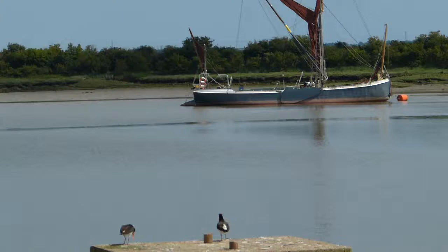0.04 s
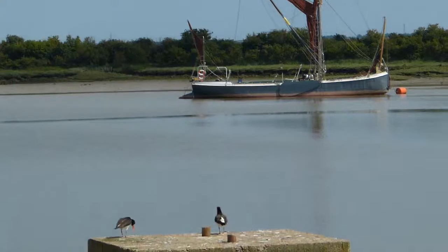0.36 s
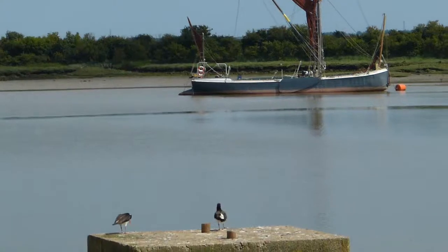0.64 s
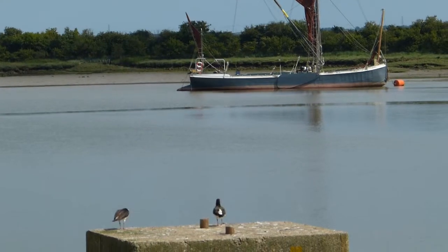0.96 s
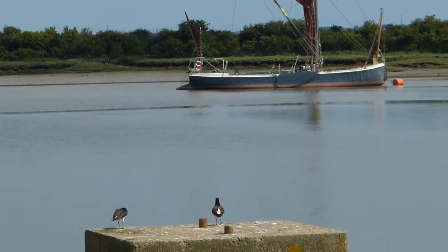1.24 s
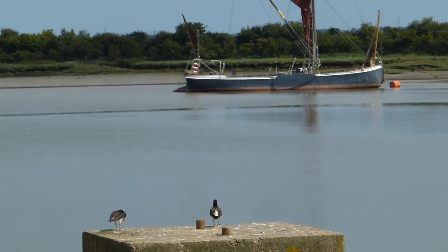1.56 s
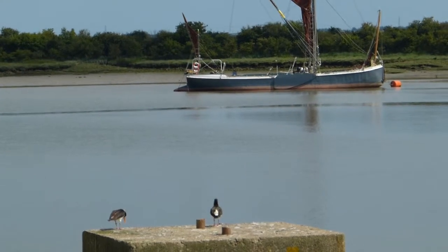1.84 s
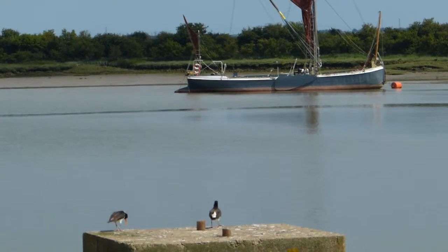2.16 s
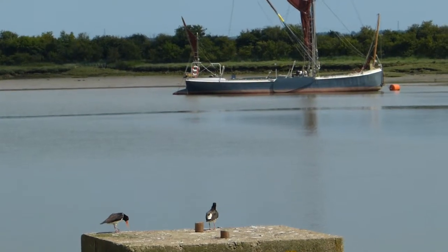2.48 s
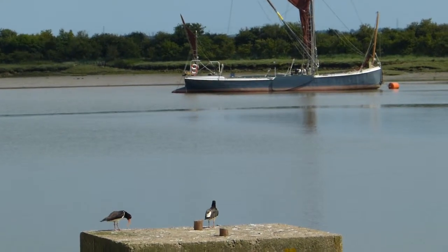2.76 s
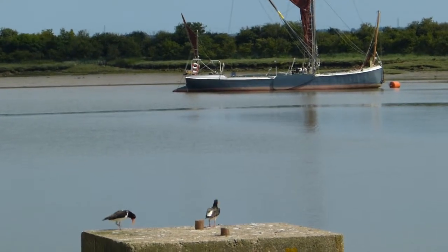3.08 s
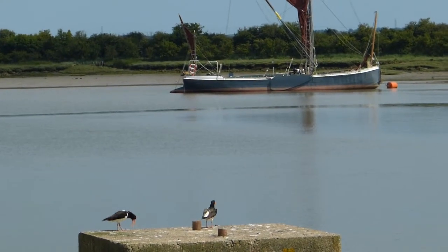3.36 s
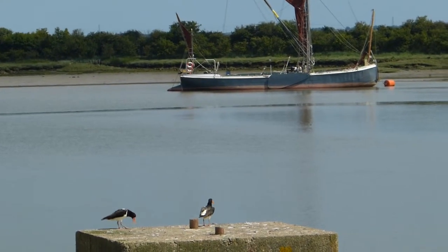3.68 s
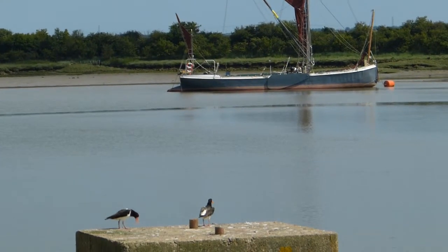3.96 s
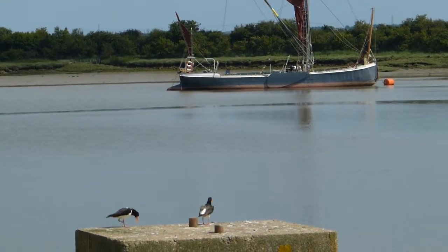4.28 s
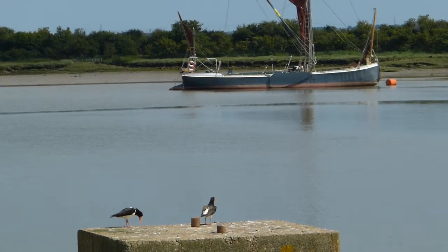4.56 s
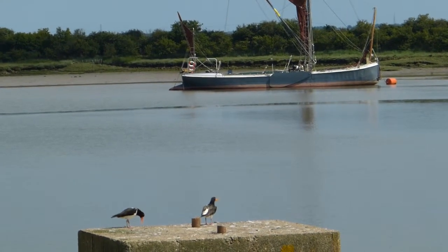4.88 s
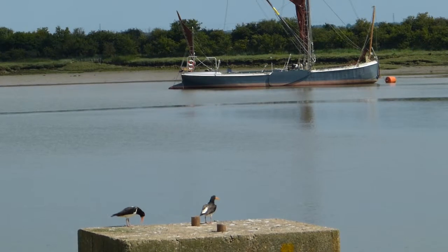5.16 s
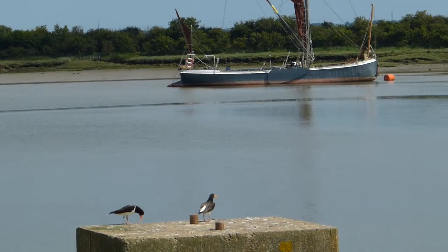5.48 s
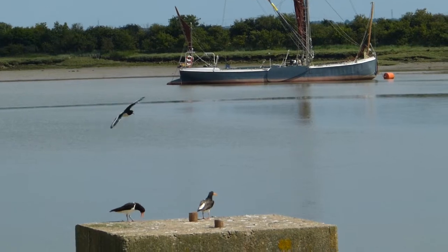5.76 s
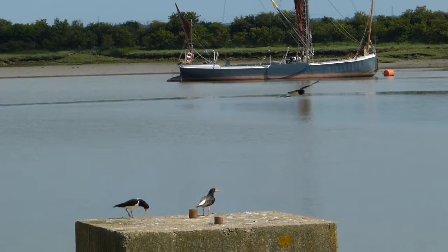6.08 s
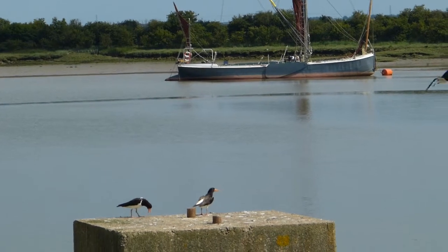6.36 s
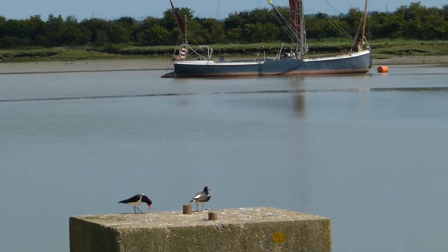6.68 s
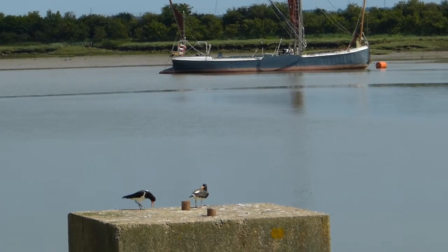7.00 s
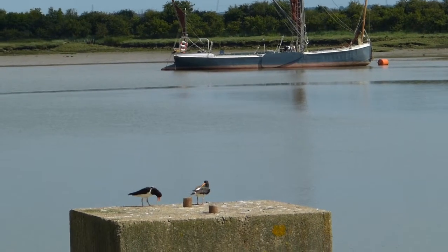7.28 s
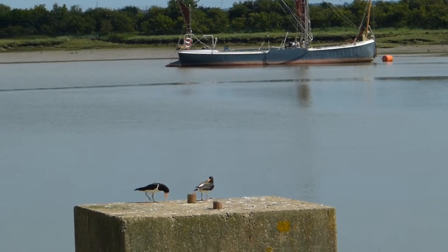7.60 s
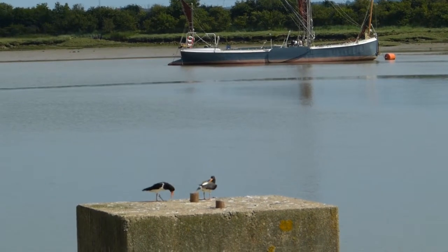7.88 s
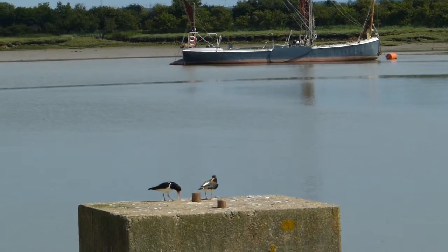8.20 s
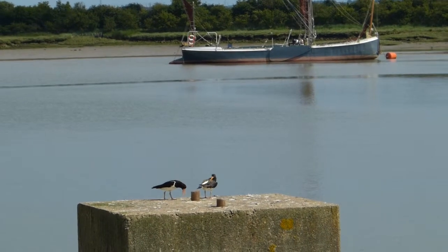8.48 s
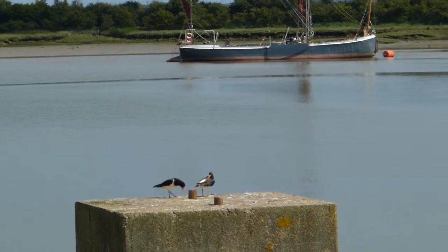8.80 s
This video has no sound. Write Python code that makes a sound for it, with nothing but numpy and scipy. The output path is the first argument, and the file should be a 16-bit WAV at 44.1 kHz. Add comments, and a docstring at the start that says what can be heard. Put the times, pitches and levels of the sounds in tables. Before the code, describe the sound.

Oystercatchers pipe loudly on a quay beside a calm estuary. Their shrill whistles come first in pairs, then as a quick trill, three drawn-out notes, falling calls and a second trill. The pairs return and grow louder to the end, each note leaving a slight echo. Behind them a light breeze hisses and softly rumbles on the microphone, and gulls cry faintly far away.

```python
"""A light breeze hisses and rumbles on a stereo microphone by a calm estuary; gulls cry far off.
At once oystercatchers on the quay pipe in alarm, each syrinx sounding shrill arched whistles in pairs.
A quick trill follows near 2 s, then three drawn-out whistles, diving notes and a second trill at 4.2 s.
From about 6 s the pairs return and grow louder to the end. After every note come close echoes
off the stonework and a faint tail from the harbour."""
import sys
import numpy as np
from scipy import signal
from scipy.fft import rfft, irfft, next_fast_len
from scipy.io import wavfile
from scipy.ndimage import map_coordinates

SR = 44100
rng = np.random.default_rng(int(sys.argv[2]) if len(sys.argv) > 2 else 0)


def generate_wav(sig):
    """Save sig (samples, or channels by samples) to the path in sys.argv[1] as 16-bit PCM at SR."""
    pcm = np.round(np.clip(np.atleast_2d(sig).T, -1, 1) * 32767).astype(np.int16)
    wavfile.write(sys.argv[1], SR, pcm)


N = 389844

# gusts on the microphone: time_s, relative_level_db
GUSTS = [(.22, -43.5), (.6, -58), (0.751, -48), (1.3, -48), (1.6, -50.5), (1.95, -46.5), (2.4, -55.5),
         (3.1, -57.5), (3.9, -72.5), (4.35, -57), (4.9, -54.5), (5.3, -61.5), (6.4, -69), (6.85, -61),
         (6.96, -53.5), (7.1, -60.5), (8.8, -64.5)]
# spectra of wind on the ports and of air over the water: frequency_hz, density_db
RUMBLE_SPECTRUM = [(25, -14.5), (45, -14.5), (70, -4.5), (130, 4.5), (170, 3.5), (210, -4.5), (290, -7.5),
                   (380, -16), (600, -21), (1200, -48.5), (3000, -120)]
AIR_SPECTRUM = [(25, -1), (60, -8), (170, 1), (300, -0.5), (500, 0), (950, -1.5), (1350, -4), (2000, -3.5),
                (2800, -7), (3800, -11.5), (6000, -6.5), (9000, -17), (12000, -28.5), (15500, -52)]
# likeness of the wind noise at the two ports: frequency_hz, correlation
PORT_COHERENCE = [(25, 0.24), (60, -0.079), (130, -0.8), (260, -0.81), (500, -0.74), (1000, -0.39),
                  (2000, 0.6), (8000, -0.07)]
# stereo balance of breeze and gulls: frequency_hz, left_minus_right_db
SHORE_BALANCE = [(250, -0.5), (500, -0.5), (1000, -2.5), (2000, -8.5), (4000, -1)]

# gull cries: start_s, length_s, top_pitch_hz, pitch_lost_share, relative_level_db, treble_db
GULL_CRIES = [(0.214, 0.47, 1025, 0.15, -54.5, -2), (0.617, 0.43, 1011, 0.12, -54, -4),
              (1.38, 0.33, 1023, 0.36, -54.5, -8), (1.7, 0.35, 1030, 0.081, -55.5, 17),
              (2.037, 0.13, 1070, .1, -50, -7), (2.65, 0.26, 1040, .14, -52, -11),
              (2.85, 0.23, 1020, 0.19, -49.5, -26), (3.521, 0.27, 1111, .12, -53.5, -8),
              (3.711, 0.24, 992, 0.087, -49.5, -14), (3.997, .31, 955, 0.067, -55.5, -6),
              (4.197, 0.35, 1032, 0.27, -50, 2), (4.501, .34, 1035, .14, -53, -0.5),
              (4.92, 0.23, 1036, .1, -50, -4), (5.099, 0.38, 1067, 0.17, -49.5, 4),
              (5.617, 0.23, 1002, 0.088, -49.5, -5), (5.943, .33, 1082, .18, -51.5, -18),
              (6.296, 0.25, 980, 0.19, -54, 11), (6.779, 0.44, 1018, .1, -48, 0.5),
              (7.025, 0.43, 1170, 0.27, -48, -13), (7.419, 0.42, 1072, 0.23, -49.5, -5),
              (7.995, 0.26, 1048, 0.17, -47.5, -12), (8.421, 0.2, 970, 0.059, -47.5, -3),
              (8.575, 0.45, 1056, 0.071, -47.5, 3)]
# a gull's harmonics 1 to 7: level_db
GULL_HARMONICS = [-13.5, -2.5, -4.5, -3, -1, -15, -25]
# resonances of a gull's throat: frequency_hz, density_db
GULL_THROAT = [(400, -37), (750, -15.5), (1020, -3), (1350, -15), (1600, -2), (1950, 4.5), (2400, -17),
               (3300, -30.5), (4200, -0.5), (5200, -10), (6500, -28), (9000, -39.5), (12000, -51.5),
               (15500, -79)]

# reverberation times of the three spaces: frequency_hz, t60_s
SHORE_DECAY = [(500, 0.057), (3000, 0.32), (12000, 0.15)]
HARBOUR_DECAY = [(500, 0.22), (3000, 1), (6500, 0.62), (12000, 0.61)]
QUAY_DECAY = [(500, 0.054), (3000, 0.1), (6500, 0.15), (12000, 0.0072)]
# reflections off the quay: delay_s, left_db, right_db
WALL_ECHOES = [(.0019, -54, -34.5), (.0029, -18, -35), (.0042, -11.5, -25.5), (.0072, -22.5, -18),
               (0.023, -17, -25.5)]

# colouring of an oystercatcher's harmonics by throat and bill, relative to the fundamental:
# pitch_hz, second_db, third_db, fourth_db, fifth_db
TRACT_COLOUR = [(1410, 7, 1, -18.5, -33), (1900, 1, -23, -30.5, -51), (2375, -4, -12, -42.5, -55.5),
                (2500, -8.5, -18.5, -37.5, -48), (2650, -11, -21.5, -38.5, -52.5),
                (2925, -12.5, -37, -51, -66.5), (2980, -14.5, -33, -59.5, -89.5),
                (3219, -4.5, -28.5, -50, -89)]
# gain from the third harmonic up: time_s, gain_db
TREBLE_GAIN = [(.2, -3.5), (1.4, 1.5), (1.9, 1.5), (4.5, 4), (6.6, 2.5), (8.8, 4)]
# contour of each kind of note:
# start_hz, shoulder_hz, end_hz, slump_share, dive_exponent, start_db, shoulder_db, dive_db
PIP_CONTOUR = (2513.5, 2425, 2084, 0.91, 4, -5.5, -5.5, -33)
PEEP_CONTOUR = (2588.5, 2663.5, 1424.5, 0.57, 3, -3.5, -2, -37)
TICK_CONTOUR = (2509, 2389.5, 2208.5, 0.8, 1.3, -2.2, 4, -35)
WHISTLE_CONTOUR = (2693, 2483.5, 1946.5, 0.92, 12.5, -2, -7.5, -23)
HICCUP_CONTOUR = (1756, 2472, 1938, -10, 3.8, -15, -3, -21.5)
# notes: start_s, rise_s, hold_s, fall_s, top_pitch_hz, level_db, brightness_db
PIP_NOTES = [(0.2209, 0.0063, 0.024, 0.029, 3187, -17.5, 0.5), (0.4881, 0.017, 0.026, 0.023, 3157, -16, -1),
             (0.771, 0.0085, 0.034, 0.026, 3155, -21.5, 2), (1.0559, 0.013, 0.026, 0.027, 3187, -18.5, -3),
             (1.3332, 0.0037, 0.032, 0.019, 3191, -17, -2.5),
             (1.5719, 0.0043, 0.018, 0.017, 3154, -18, 1.5),
             (2.4082, 0.021, 0.00082, 0.017, 2883, -18, 0.5),
             (3.8532, 0.012, 0.0014, 0.019, 2900, -17.5, 0), (4.0635, 0.009, 0.0083, 0.021, 3096, -17, 1),
             (4.8175, 0.031, 0, 0.0088, 3094, -17, -1.5), (4.9955, 0.007, 0.012, 0.02, 3152, -16.5, -1.0),
             (5.2344, 0.008, 0.0074, 0.029, 3110, -16, -2), (6.2664, 0.009, 0, 0.024, 2965, -17.5, 1),
             (6.5034, 0.0078, 0.0085, 0.014, 3007, -17, 2.5),
             (6.7245, 0.006, 0.011, 0.023, 3150, -17.0, 2.5),
             (6.9463, 0.0054, 0.013, 0.021, 3156, -16.0, 1.5),
             (7.169, 0.007, 0.01, 0.023, 3158, -16.5, -1.5), (7.3754, 0.017, 0, 0.026, 3170, -17, -0.5),
             (7.5834, 0.018, 0.0015, 0.023, 3186, -15.0, -0.5), (7.7995, 0.019, 0, 0.025, 3170, -15, -0.5),
             (8.0206, 0.021, 0, 0.025, 3183, -14.0, 0), (8.2499, 0.021, 0, 0.023, 3155, -13, -2.0),
             (8.4807, 0.01, 0.0073, 0.02, 3168, -14.5, 0.5), (8.7119, 0.014, 0.004, 0.023, 3183, -15, 1.5)]  # high arches that close the pairs
PEEP_NOTES = [(0.3846, 0.0097, 0.00078, 0.035, 2620, -21.5, 1), (0.6655, 0.014, 0.0, 0.031, 2598, -23, 2),
              (0.9473, 0.012, 0.00084, 0.036, 2905, -19, -8.5), (1.2286, 0.013, 0.0, 0.034, 2858, -19, -7),
              (1.4867, 0.008, 0.0031, 0.028, 2936, -16.5, -6.5),
              (2.2442, 0.02, 0.002, 0.0098, 2687, -23, 2.5), (2.3565, 0.0087, 0, 0.044, 2500, -24, -4.5),
              (3.2365, 0.0015, 0.018, 0.083, 2665, -18.0, 0.5),
              (3.4964, 0.0011, 0.02, 0.089, 2680, -19.5, 1.5), (3.7451, 0.0035, 0.015, 0.05, 2652, -19, -1),
              (3.99, 0.004, 0.0019, 0.038, 2610, -18.5, -2.5), (5.1269, 0.008, 0.006, 0.048, 2935, -14, -2),
              (5.3816, 0.006, 0.023, 0.083, 2993, -15.5, -2), (5.6454, 0.0079, 0.0089, 0.07, 2953, -15, -2),
              (5.9018, 0.015, 0.0059, 0.054, 2948, -15.5, 0.5),
              (6.1554, 0.011, 0.0045, 0.053, 2944, -16.5, 0.5),
              (6.4017, 0.019, 0.00037, 0.035, 2837, -16.5, 0.0),
              (6.6396, 0.0017, 0.0069, 0.033, 2612, -18, 0.5), (6.8589, 0.013, 0.0, 0.026, 2860, -16, 0),
              (7.0783, 0.015, 0, 0.037, 2980, -16.0, -0.5), (7.3026, 0.014, 0, 0.042, 2970, -16.5, -1.0),
              (7.5095, 0.019, 0.0008, 0.033, 2910, -13.5, -1.5),
              (7.7286, 0.0028, 0.0093, 0.041, 2737, -17.0, 1),
              (7.9481, 0.0042, 0.0042, 0.043, 2760, -17.0, 1),
              (8.1704, 0.004, 0.0078, 0.045, 2710, -15.5, -1),
              (8.4038, 0.0024, 0.0037, 0.037, 2684, -18.5, 1.0),
              (8.626, 0.0041, 0.0082, 0.039, 2687, -19.5, 3)]  # lower, long-diving notes that open the pairs
TICK_NOTES = [(1.6866, 0.0015, 0.0031, 0.025, 2580, -22, -1),
              (1.7474, 0.01, 0.0036, 0.0048, 2460, -22.0, -4),
              (1.8079, 0.0057, 0.0038, 0.011, 2470, -22.5, -3),
              (1.8668, 0.002, 0.0076, 0.019, 2532, -23, -2),
              (1.9341, 0.00067, 0.0082, 0.015, 2534, -23, -2.5),
              (2.0059, 0.0012, 0.0033, 0.013, 2560, -22, -2),
              (2.0788, 0.0012, 0.0041, 0.013, 2550, -24.5, -2),
              (2.156, 0.0063, 0.001, 0.0056, 2480, -25, -2.5),
              (4.1901, 0.0012, 0.0018, 0.016, 2500, -20.5, -2),
              (4.2606, 0.002, 0.00083, 0.014, 2480, -22, -2.5),
              (4.33, 0.0023, 0.0051, 0.0097, 2650, -18.5, -5),
              (4.404, 0.0075, 0.0011, 0.0073, 2850, -20.0, -6.5),
              (4.4757, 0.0035, 0.0092, 0.0044, 2880, -18, -6.5),
              (4.5539, 0.013, 0.0045, 0.005, 2920, -17.5, -4),
              (4.6469, 0.0054, 0.0097, 0.0037, 2890, -16.5, -5.5),
              (4.741, 0.0066, 0.0025, 0.007, 2790, -19, -4.5),
              (5.7657, 0.0037, 0.0054, 0.019, 2680, -19, 2),
              (6.015, 0.0015, 0.0082, 0.026, 2696, -18.0, 0.5)]  # the short notes of the trills
WHISTLE_NOTES = [(2.5483, 0.0044, 0.044, 0.062, 2662, -18.5, -1.5),
                 (2.7691, 0.0054, 0.03, 0.084, 2650, -16.5, -2.5),
                 (2.9986, 0.0048, 0.041, 0.083, 2652, -17.5, -2)]  # drawn-out level notes
HICCUP_NOTES = [(3.3442, 0.014, 0.0068, 0.016, 2486, -25, -2),
                (3.5941, 0.018, 0.0065, 0.014, 2465, -24.5, -2.5),
                (5.4857, 0.015, 0.0089, 0.021, 2513, -22.5, -0.5)]  # upward swoops after a long dive


def amp(db):
    """Amplitude ratio of a level in decibels."""
    return 10 ** (np.asarray(db) / 20)


def unit(x):
    """Normalisation to rms 1."""
    return x / np.sqrt(np.mean(x ** 2) + 1e-20)


def ease(u):
    """A raised-cosine step from 0 to 1."""
    return np.sin(np.pi / 2 * np.clip(u, 0, 1)) ** 2


def along(points, hz):
    """Interpolation on a logarithmic frequency axis."""
    frequencies, values = np.transpose(points)
    return np.interp(np.log(hz + 1), np.log(frequencies + 1), values)


def wobble(rate_hz, size):
    """Smooth random modulation: a spline through Gaussian knots."""
    knots = rng.standard_normal(int(size * rate_hz / SR) + 4)
    return map_coordinates(knots, [np.arange(size) * rate_hz / SR])


def filtered(x, response):
    """Linear filtering: the spectrum is multiplied by a frequency response."""
    size = next_fast_len(N + SR // 2)
    return irfft(rfft(x, size) * response(np.fft.rfftfreq(size, 1 / SR)), size)[..., :N]


def add(track, start_s, sound):
    """Superposition of a sound on a track."""
    part = track[max(round(start_s * SR), 0):][:len(sound)]
    part += sound[:len(part)]


def port_noise(spectrum):
    """Partial coherence: the ratio of mid to side noise sets how alike the two ports sound."""
    def response(hz):
        angle = np.arccos(np.clip(along(PORT_COHERENCE, hz), -1, 1)) / 2
        return amp(along(spectrum, hz)) * [np.cos(angle), np.sin(angle)]
    mid, side = filtered(rng.standard_normal((2, N)), response)
    return unit(np.array([mid + side, mid - side]))


def breeze():
    """Flow noise: gusts rumble on the microphone over a nearly steady hiss of air."""
    gust_db = np.interp(np.arange(N) / SR, *np.transpose(GUSTS))
    rumble_db = gust_db + 1 + 1.3 * wobble(9.1, N) + 1.7 * wobble(38, N)
    rumble = amp(rumble_db) * port_noise(RUMBLE_SPECTRUM)
    air = amp(-54 + 0.21 * wobble(3.6, N)) * port_noise(AIR_SPECTRUM)
    return rumble + air


def reverberation(x, decay, delay_s, width):
    """A diffuse field: convolution with noise that decays exponentially, each band at its own rate."""
    hz, t, spectra = signal.stft(rng.standard_normal((2, SR // 2)), SR, nperseg=256)
    envelope = amp(-60 * t / along(decay, hz)[:, None])
    mid, side = signal.istft(spectra * envelope, SR, nperseg=256)[1]
    tail = np.array([mid + width * side, mid - width * side])
    delayed = np.pad(x, (round(delay_s * SR), 0))
    return signal.fftconvolve(delayed[None], tail / np.linalg.norm(tail[0]), axes=1)[:, :N]


def gulls(jitter=0.0078, crest_share=.3, rise_share=0.064, flutter_db=3.0):
    """Source and filter: harmonics and throat-shaped noise, equal in power, blurred by distance."""
    voiced, rasp_envelope = np.zeros(N), np.zeros(N)
    for start_s, length_s, top_hz, sag, level_db, treble_db in GULL_CRIES:
        u = np.linspace(0, 1, int(length_s * SR))
        before = np.clip(1 - u / crest_share, 0, 1)
        after = np.clip((u - crest_share) / (1 - crest_share), 0, 1)
        pitch = top_hz * (1 - rise_share * before ** 2 - sag * after ** 0.99)
        phase = 2 * np.pi * np.cumsum(pitch * (1 + jitter * wobble(500, len(u)))) / SR
        cry = sum(amp(db + treble_db * (k > 2)) * np.sin(k * phase)
                  for k, db in enumerate(GULL_HARMONICS, 1))
        swell = np.abs(np.sin(np.pi * u)) ** .5
        flutter = amp(flutter_db * wobble(70, len(u)))
        envelope = np.sqrt(.5) * amp(level_db) * unit(swell * flutter)
        add(voiced, start_s, envelope * unit(cry))
        add(rasp_envelope, start_s, envelope)
    rasp = unit(filtered(rng.standard_normal(N), lambda hz: amp(along(GULL_THROAT, hz))))
    cries = voiced + rasp_envelope * rasp
    return amp(-5) * cries + amp(-6) * reverberation(cries, SHORE_DECAY, delay_s=.005, width=.95)


def quay(x):
    """Reflection: echoes off stonework interfere with the direct sound; quay and harbour reverberate."""
    def comb(hz):
        return 1 + sum(amp([[left_db], [right_db]]) * np.exp(-2j * np.pi * hz * delay_s)
                       for delay_s, left_db, right_db in WALL_ECHOES)
    near = amp(-17) * reverberation(x, QUAY_DECAY, delay_s=.002, width=.6)
    far = amp(-28.5) * reverberation(x, HARBOUR_DECAY, delay_s=0.022, width=0.45)
    return filtered(x, comb) + near + far


def register_leap(pitch, top_hz, break_hz, half_leap_hz):
    """A register break: the syrinx flips across it in notes that peak well above it."""
    over = (pitch - break_hz) / half_leap_hz
    clears_break = top_hz > break_hz + half_leap_hz
    return clears_break * half_leap_hz * np.tanh(10 * over) * np.exp(-over ** 2)


def arch(contour, t, rise_s, hold_s, fall_s, top_hz, dome_hz=37.04):
    """Pitch and level follow the driving pressure: they climb, hold, then sink as it is spent."""
    start_hz, shoulder_hz, end_hz, slump_share, dive_exponent, start_db, shoulder_db, dive_db = contour
    shoulder_hz = min(shoulder_hz, top_hz)
    climb_left = 1 - ease(t / rise_s)
    spent = np.clip((t - rise_s - hold_s) / fall_s, 0, 1)
    slump, dive = ease(spent / slump_share), spent ** dive_exponent
    dome_s = rise_s + hold_s + 0.17 * fall_s  # even the held top is slightly arched
    pitch = top_hz - (top_hz - start_hz) * climb_left
    pitch -= (top_hz - shoulder_hz) * slump + (shoulder_hz - end_hz) * dive
    pitch -= dome_hz * np.clip(2 * t / dome_s - 1, -1, 1) ** 2
    flip_up = (t < rise_s) * register_leap(pitch, top_hz, break_hz=2900, half_leap_hz=103)
    flip_down = (spent > 0) * register_leap(pitch, top_hz, break_hz=2790, half_leap_hz=78)
    level_db = start_db * climb_left + shoulder_db * slump + dive_db * dive
    return pitch + flip_up + flip_down, level_db, spent


def syrinx(contour, rise_s, hold_s, fall_s, top_hz, second_db, upper_db):
    """Self-sustained oscillation: a harmonic tone snaps on, then frays and dulls as pressure runs out."""
    attack_s, release_s, shortest_fall_s = .0017, .00063, .006
    rise_s, fall_s = max(rise_s, attack_s), max(fall_s, shortest_fall_s)
    length_s = rise_s + hold_s + fall_s
    t = np.arange(int(length_s * SR)) / SR
    shake = lambda rate_hz: wobble(rate_hz, SR // 4)[:len(t)]
    pitch, level_db, spent = arch(contour, t, rise_s, hold_s, fall_s, top_hz)
    jitter = 0.0024 * (1 + 3.6 * spent ** 2) * shake(900)
    waver = 0.0022 * shake(150)
    phase = 2 * np.pi * np.cumsum(pitch * (1 + jitter + waver)) / SR
    tone = np.sin(phase)
    tract_hz, *tract_db = np.transpose(TRACT_COLOUR)
    for k, colour_db in enumerate(tract_db, 2):
        edge_db = second_db if k == 2 else upper_db - 6 * (k - 3) * spent
        shimmer_db = 1.7 * shake(350)
        tone += amp(np.interp(pitch, tract_hz, colour_db) + edge_db + shimmer_db) * np.sin(k * phase)
    gate = np.clip(t / attack_s, 0, 1) * np.clip((length_s - t) / release_s, 0, 1)
    tremble_db = 1.15 * shake(160)
    return tone * gate * amp(level_db + tremble_db)


def oystercatchers():
    """Superposition of five kinds of piping note, each with its own contour."""
    track = np.zeros(N)
    kinds = [(PIP_NOTES, PIP_CONTOUR), (PEEP_NOTES, PEEP_CONTOUR), (TICK_NOTES, TICK_CONTOUR),
             (WHISTLE_NOTES, WHISTLE_CONTOUR), (HICCUP_NOTES, HICCUP_CONTOUR)]
    for notes, contour in kinds:
        for start_s, rise_s, hold_s, fall_s, top_hz, level_db, brightness_db in notes:
            second_db = brightness_db - 1.5
            upper_db = second_db + np.interp(start_s, *np.transpose(TREBLE_GAIN))
            note = syrinx(contour, rise_s, hold_s, fall_s, top_hz, second_db, upper_db)
            add(track, start_s, amp(level_db) * note)
    return track


def scene():
    """Level difference sets direction: gulls and breeze lie a little right, the near birds central."""
    balance = lambda hz: amp(np.array([[1], [-1]]) * along(SHORE_BALANCE, hz) / 2)
    shore = filtered(gulls() + breeze(), balance)
    return quay(oystercatchers()) + shore


def record(dry, switch_on_s=.2205, band_limit_hz=15600, dc_offset=-.003):
    """Band limiting: the camera, silent until switched on, low-passes the sound and a slight offset."""
    switched_on = np.arange(N) / SR > switch_on_s
    return filtered((dry + dc_offset) * switched_on, lambda hz: hz < band_limit_hz)


dry = scene()
out = record(dry)
generate_wav(out)
```